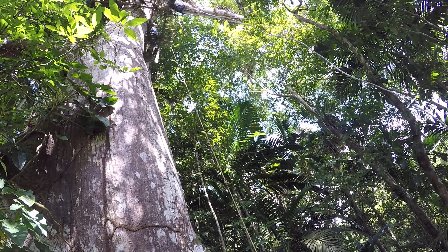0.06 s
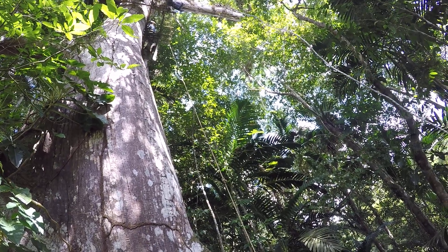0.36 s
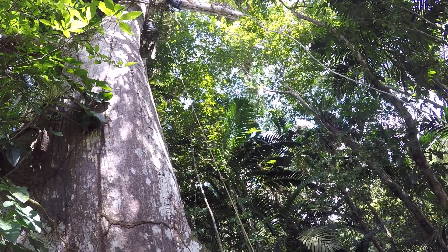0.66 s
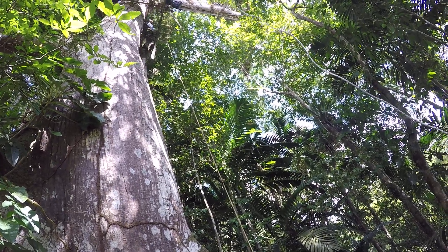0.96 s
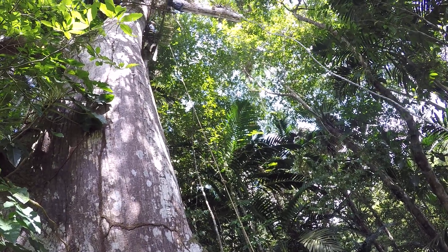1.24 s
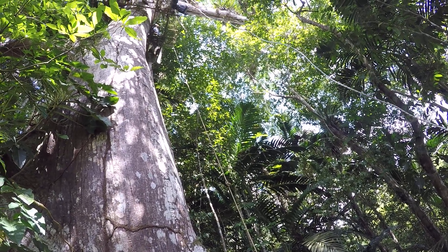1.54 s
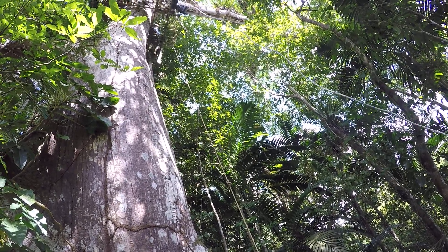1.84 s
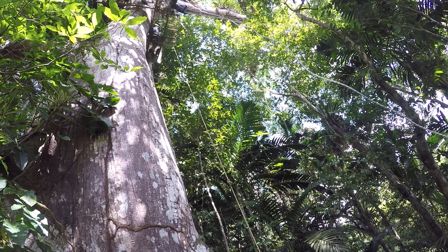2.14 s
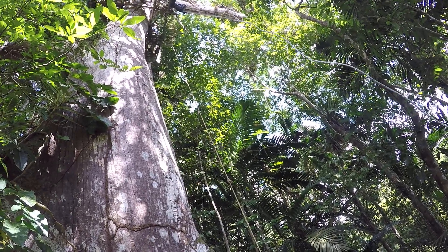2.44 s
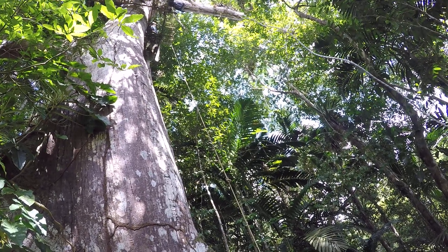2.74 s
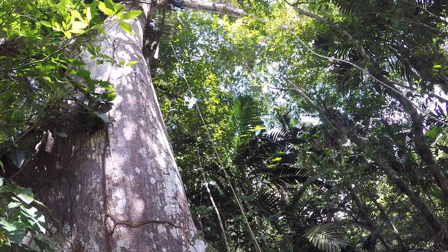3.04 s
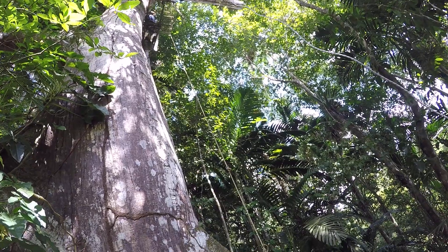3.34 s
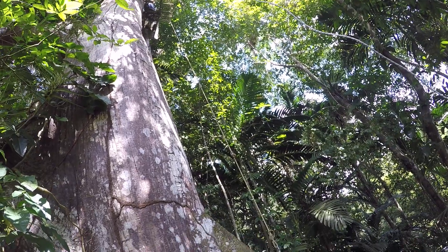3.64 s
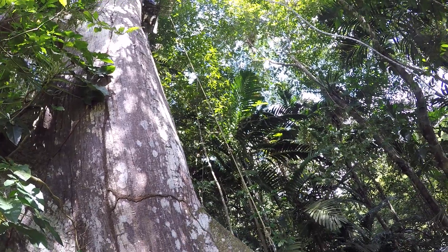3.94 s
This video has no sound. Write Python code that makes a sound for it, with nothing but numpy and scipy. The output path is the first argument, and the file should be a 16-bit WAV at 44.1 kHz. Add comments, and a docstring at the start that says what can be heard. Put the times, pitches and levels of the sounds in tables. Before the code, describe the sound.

Insects drone steadily for four seconds in a dense forest, with a cicada's thin, wavering buzz over soft hiss. Birds give brief metallic calls, clearest at 1.6 seconds and fainter near 0.8 and 3.3, with high, thin chips around 2.1 and 3.6. The hand-held microphone rumbles throughout, with soft thumps and knocks near 0.7, 1.3, 2.2, 2.7 and 3.7. A twig ticks faintly at 0.7.

```python
"""A cicada holds a buzzing tone near 2.5 kHz over the broad drone of far insects in dense tropical forest.
The buzz is three partials, one pulse rate apart, roughened by the foliage.
Small birds give metallic calls and thin falling chips that smear out among the trunks.
Close by, twigs tick and a hand-held camera rumbles, thumps and knocks softly."""
import sys
import numpy as np
from scipy import signal
from scipy.fft import rfft, irfft
from scipy.io import wavfile

SR = 44100
rng = np.random.default_rng(int(sys.argv[2]) if len(sys.argv) > 2 else 0)


def bounce(signal):
    """Save signal as a 16-bit WAV file at the path given by the first command-line argument."""
    frames = np.transpose(np.atleast_2d(signal))
    limited = np.clip(frames, -1, 1)
    pcm = np.round(limited * 32767).astype(np.int16)
    wavfile.write(sys.argv[1], SR, pcm)


N = 176400
T = np.arange(N) / SR
FREQS = np.maximum(np.arange(N // 2 + 1) * SR / N, 1)
RASP_RATE_HZ = 346   # how fast the pitch of a bird's note jitters


def from_db(db):
    """Decibels to gain."""
    return 10 ** (np.asarray(db) / 20)


def rms_one(x):
    """Scale to unit power."""
    return x / np.sqrt(np.mean(x ** 2) + 1e-20)


def drift(rate_hz):
    """Random modulation of unit power, rolled off above rate_hz."""
    return rms_one(irfft(rfft(rng.standard_normal(N)) / (1 + (FREQS / rate_hz) ** 2), N))


def colour(points):
    """An EQ curve through points of f/Hz, level/dB."""
    hz, db = np.transpose(points)
    return from_db(np.interp(np.log(FREQS), np.log(hz), db))


def band(hz, width):
    """A bell-shaped EQ curve, width Hz wide at half power."""
    return .5 ** (2 * ((FREQS - hz) / width) ** 2)


def noise(gain):
    """Noise with the given amplitude per root Hz."""
    return irfft(rfft(rng.standard_normal(N)) * gain, N) * np.sqrt(SR / 2)


def swell(start, rise, shape):
    """A rounded attack to 1 and a slower decay; a higher shape tightens the peak."""
    age = np.maximum(T - start, 0) / rise
    return (age * np.exp(1 - age)) ** shape


def note_gate(start, length, edge_s=0.0078):
    """A note envelope with short linear fades."""
    return np.clip(np.minimum(T - start, start + length - T) / edge_s, 0, 1)


def phase_of(hz):
    """Running phase of a moving pitch."""
    return 2 * np.pi * np.cumsum(hz) / SR


def air():
    """Still air and leaves lay a steady bed of soft noise."""
    # spectrum of the bed: f/Hz, density/dB per Hz
    spectrum = [(100, -88.5), (200, -92), (320, -95), (550, -96.5), (850, -99), (1400, -101), (2200, -97.5),
                (2900, -102), (4400, -104), (5500, -104.5), (7500, -109), (9500, -111.3), (12000, -114),
                (13600, -112.5), (14500, -113.5), (15100, -108)]
    return noise(colour(spectrum))


def insect_chorus(flutter_db=1.02, flutter_hz=9):
    """Many far insects blur into fluttering bands."""
    # bands of the drone: f/Hz, width/Hz, density/dB per Hz
    bands = [(1195, 187, -94.5), (1517, 120, -100), (1848, 252, -90.5), (2443, 510, -97), (3075, 450, -101),
             (3742, 456, -96), (4204, 140, -100), (4560, 250, -109)]
    return sum(noise(from_db(db) * band(hz, width)) * from_db(flutter_db * drift(flutter_hz))
               for hz, width, db in bands)


def camera_handling():
    """The body wobbles a few cycles at each thump, fingers rub and knock, air and grip rumble."""
    # thumps of the body: t/s, level/dB, f/Hz, rise/s
    thumps = [(.703, -29.5, 47.5, 0.027), (0.986, -32.5, 51.4, 0.039), (1.086, -35.5, 42.3, 0.023),
              (1.296, -26, 37.1, 0.042), (1.305, -36.5, 78.3, 0.026), (1.668, -43, 71.6, .018),
              (2.204, -26.5, 47, .023), (2.332, -33.5, 44.5, .02), (2.66, -25.5, 46.3, 0.02),
              (2.86, -39.5, 48, 0.043), (3.159, -32.5, 46.8, 0.023), (3.7, -25, 47, 0.024)]
    # finger rubs and knocks: t/s, level/dB, rise/s
    knocks = [(.657, -52, 0.0089), (.696, -43.5, 0.008), (0.976, -46, 0.01), (1.26, -54.5, .01),
              (1.327, -45, .017), (1.429, -55, 0.011), (1.466, -45, 0.0039), (1.669, -52, 0.011),
              (2.108, -47, 0.0053), (2.329, -47, 0.011), (2.821, -47, .008), (2.862, -46, 0.0038),
              (2.912, -50, 0.0096), (3.74, -46, 0.0077), (3.763, -47, 0.014)]
    # tone colour of the casing: f/Hz, relative level/dB
    casing = [(50, 0), (90, 3), (150, 2), (210, -22.5), (350, -23), (700, -31.5), (1400, -35), (3000, -53),
              (8000, -78)]
    # rumble of air and grip: f/Hz, density/dB per Hz
    rumble_spectrum = [(10, -70.5), (22, -68), (40, -62.5), (55, -66.5), (75, -77), (100, -84),
                       (160, -94.5), (300, -112), (1000, -160)]
    # fader ride on that rumble: t/s, gain/dB
    rumble_ride = [(0, -2), (.6, -2), (1.0, -0.5), (1.4, 1), (1.9, 1), (2.5, -2), (3.0, 1), (4.0, 0)]
    wobble = sum(from_db(db) * swell(start, rise, shape=2.33) * np.sin(2 * np.pi * hz * (T - start))
                 for start, db, hz, rise in thumps)
    touch = sum(from_db(db) * swell(start, rise, shape=2.36) for start, db, rise in knocks)
    fingers = touch * rms_one(noise(colour(casing)))
    rumble_gain = from_db(np.interp(T, *np.transpose(rumble_ride)))
    return fingers - wobble + rumble_gain * noise(colour(rumble_spectrum))


def twigs(rise_s=0.0026):
    """Dry twigs tick close by, each a tiny burst of band noise."""
    # ticks: t/s, level/dB, f/Hz, width/Hz
    ticks = [(0.702, -57, 1110, 690), (2.072, -68, 10000, 6000)]
    return sum(from_db(db) * swell(start, rise_s, shape=1) * rms_one(noise(band(hz, width)))
               for start, db, hz, width in ticks)


def bird_chips(rasp_hz=180):
    """Smaller birds give high, thin whistles that fall with a raspy pitch jitter."""
    # chips: t/s, mid-note f/Hz, fall/Hz, length/s, level before the forest/dB
    chips = [(.302, 9160, 1900, .06, -73), (.39, 8540, 900, .07, -76), (2.07, 9800, 500, 0.017, -60.5),
             (2.275, 10300, 400, 0.019, -68), (3.603, 8400, 650, .058, -60)]
    rasp = rasp_hz * drift(RASP_RATE_HZ)
    whistles = np.zeros(N)
    for start, hz, fall, length, db in chips:
        progress = np.clip((T - start) / length, 0, 1)
        pitch = hz + fall * (.5 - progress) + rasp
        whistles += from_db(db) * note_gate(start, length) * np.sin(phase_of(pitch))
    return whistles


def raspy_tones(partials, rasp_hz):
    """Held tones, each with its own fast pitch jitter, rasp_hz deep (rms)."""
    return sum(from_db(db) * np.sin(phase_of(hz + rasp_hz * drift(RASP_RATE_HZ))) for hz, db in partials)


def metallic_bird_calls(hiss_db=-13, top_lag_s=0.011):
    """A cluster of close tones sounds metallic; a top layer of partials and hiss opens just after."""
    # calls: t/s, length/s, level before the forest/dB, top layer gain/dB
    calls = [(0, 0.027, -59.5, -10), (0.799, .065, -58, 2), (1.607, .064, -49, -3), (1.92, 0.041, -63, -14),
             (3.311, 0.031, -60, -10)]
    # cluster of close tones: f/Hz, relative level/dB
    cluster_partials = [(3815, -3.5), (3935, -4.5), (4010, -3), (4090, -6), (4175, -5.5)]
    # thin upper partials: f/Hz, relative level/dB
    top_partials = [(4890, -17), (5865, -15.5), (6470, -25), (8630, -20.5)]
    # hiss of the rasp: f/Hz, relative level/dB
    hiss_spectrum = [(2500, -40), (4300, 2), (5500, 0.5), (7200, -2.5), (9300, -7.5), (11500, -14),
                     (15000, -25)]
    cluster = raspy_tones(cluster_partials, rasp_hz=35.1)
    top = raspy_tones(top_partials, rasp_hz=46)
    top += from_db(hiss_db) * rms_one(noise(colour(hiss_spectrum)))
    song = np.zeros(N)
    for start, length, db, top_db in calls:
        top_gate = from_db(top_db) * note_gate(start + top_lag_s, length)
        song += from_db(db) * (note_gate(start, length) * cluster + top_gate * top)
    return song


def forest_reverb(source, t60_s=0.7, direct_db=-4.5, wet_db=-2.5):
    """Trunks and leaves return a dense, dying cloud of echoes."""
    tail = rng.standard_normal(N) * from_db(-60 * T / t60_s)
    echoes = signal.fftconvolve(source, tail / np.linalg.norm(tail))[:N]
    return from_db(direct_db) * source + from_db(wet_db) * echoes


def far_tone(hz, scatter=0.21):
    """A tone of unit power; scattering in the foliage makes its level and phase waver."""
    phase = phase_of(hz)
    return rms_one((1 + scatter * drift(19)) * np.sin(phase) + scatter * drift(12) * np.cos(phase))


def insect_whines(wander_hz=2.27):
    """Insects further off hold thin tones, each wandering slightly in pitch."""
    # whines: f/Hz, level/dB
    whines = [(2671, -80), (2771, -89.5), (3725, -88), (11688, -99), (13667, -93)]
    return sum(from_db(db) * far_tone(hz + wander_hz * drift(3.25)) for hz, db in whines)


def cicada(pitch_hz=2472, pulses_per_s=99.5, wander_hz=2.27):
    """A pulsed buzz: three partials, one pulse rate apart, wander in pitch together."""
    # partial envelopes: t/s, lower level/dB, centre level/dB, upper level/dB
    envelopes = [(0, -65, -75, -76), (.3, -66, -72, -67.5), (.7, -67.5, -69, -70), (1.05, -67.5, -79, -70),
                 (1.45, -84, -74, -69.5), (2.2, -72.5, -71, -69.5), (2.9, -79, -74, -67.5),
                 (3.45, -75, -74.5, -72), (3.95, -74, -65.5, -77)]
    times, *levels = np.transpose(envelopes)
    centre = pitch_hz + wander_hz * drift(2.64)
    return sum(from_db(np.interp(T, times, db)) * far_tone(centre + side * pulses_per_s)
               for side, db in zip((-1, 0, 1), levels))


def scene():
    """Air, insects, birds, twigs and handling in mono; only the birds feed the reverb."""
    bed = air() + insect_chorus()
    buzz = cicada() + insect_whines()
    birds = forest_reverb(bird_chips() + metallic_bird_calls())
    return (bed + buzz + birds + twigs() + camera_handling())[None]


def record(dry):
    """A steep low-pass takes off the very top."""
    cutoff_hz = 15260
    return signal.sosfilt(signal.ellip(12, .1, 80, cutoff_hz, fs=SR, output="sos"), dry)


dry = scene()
out = record(dry)
bounce(out)
```